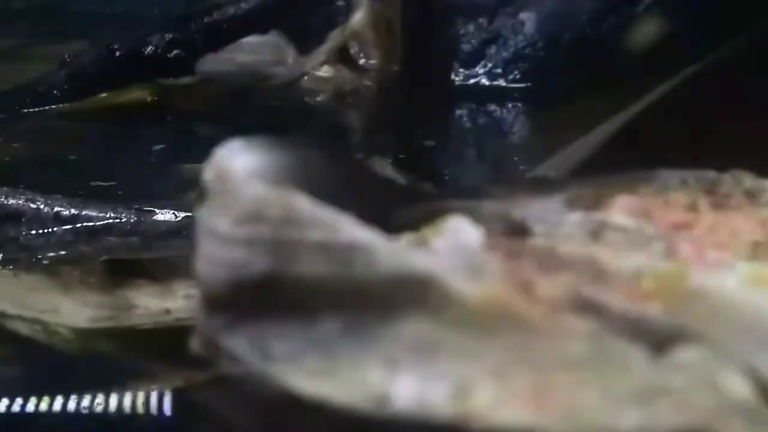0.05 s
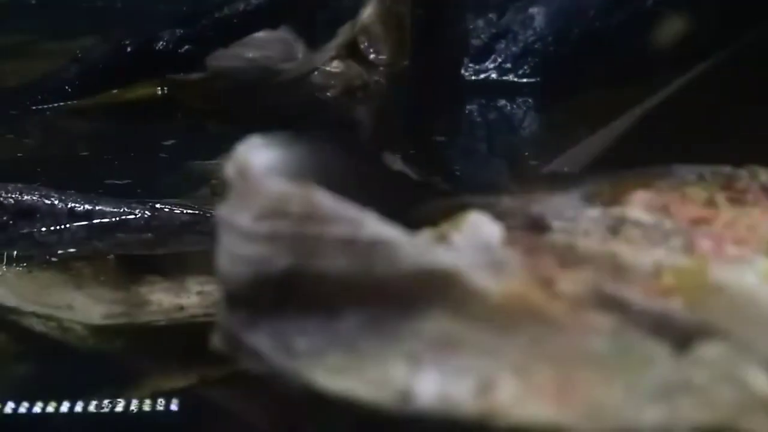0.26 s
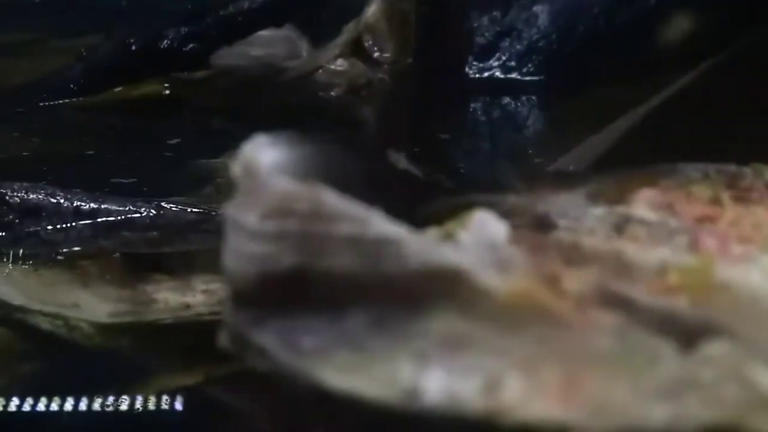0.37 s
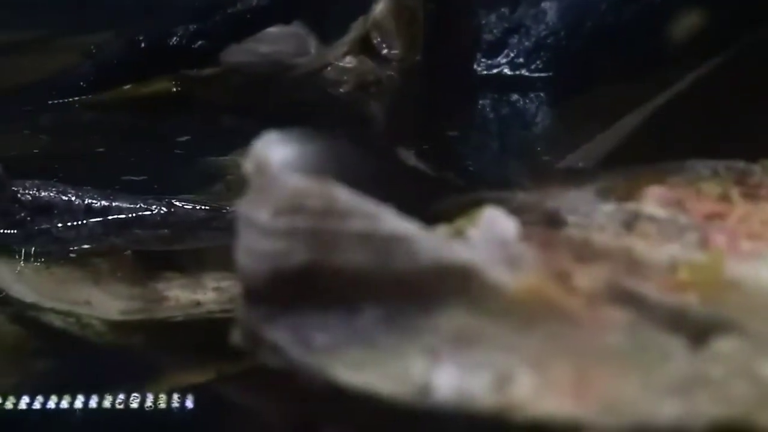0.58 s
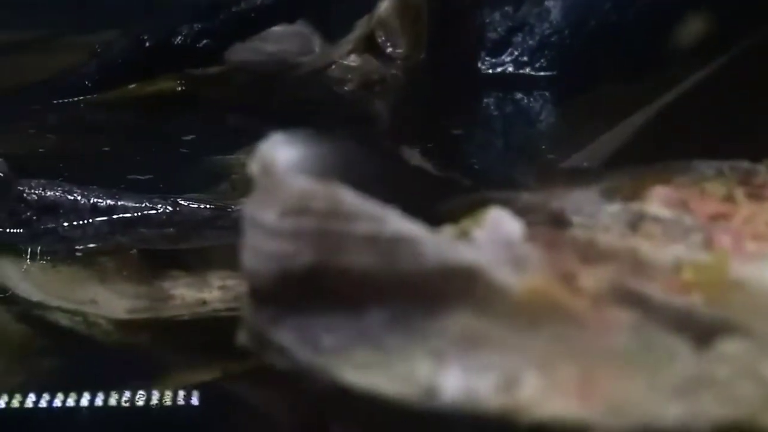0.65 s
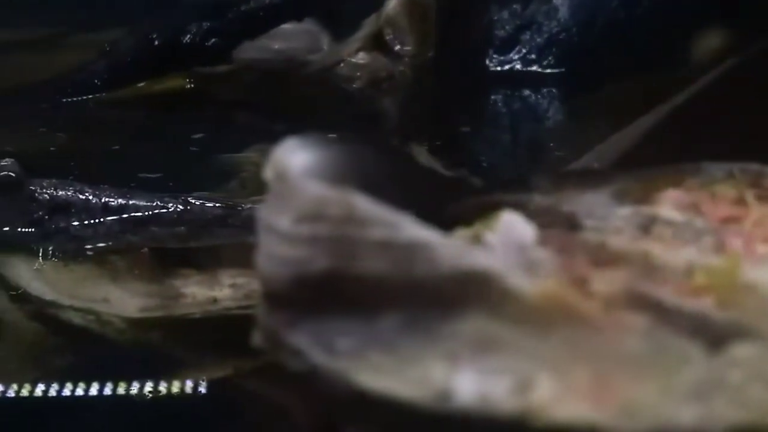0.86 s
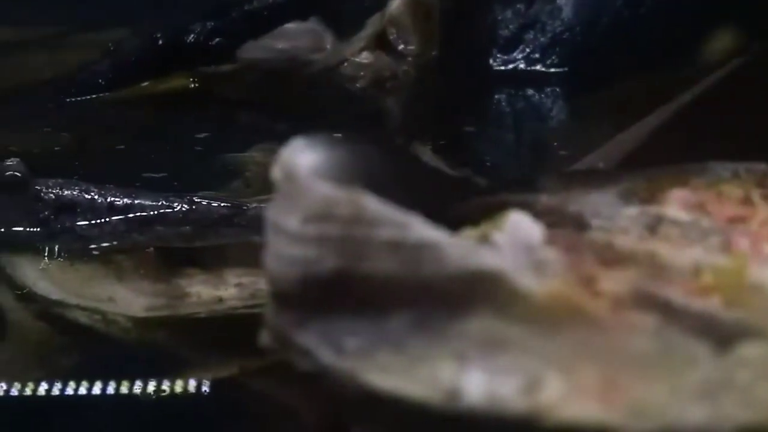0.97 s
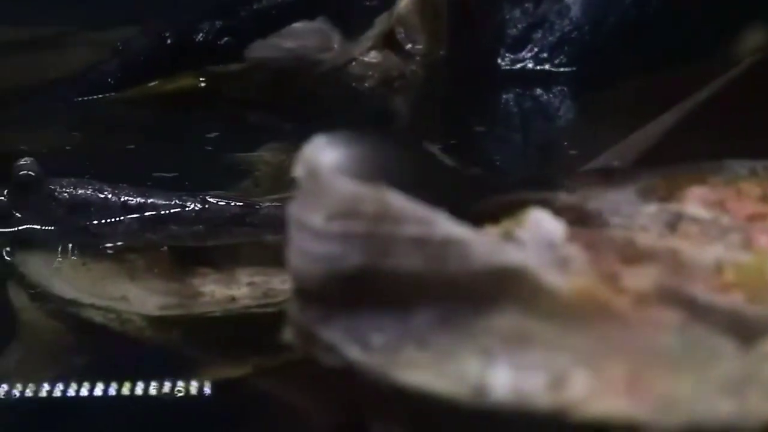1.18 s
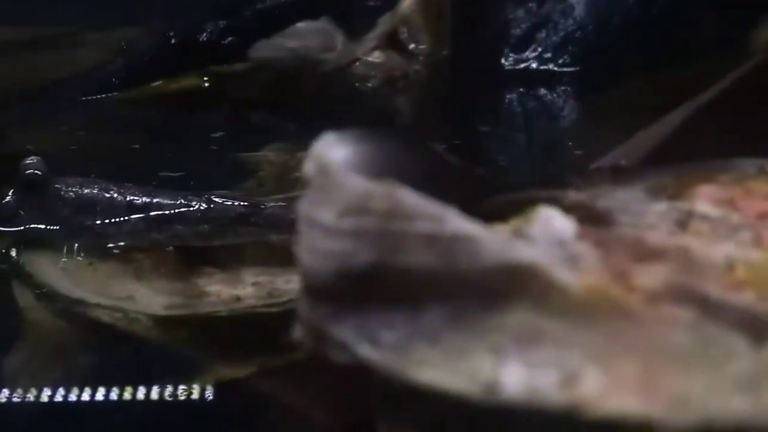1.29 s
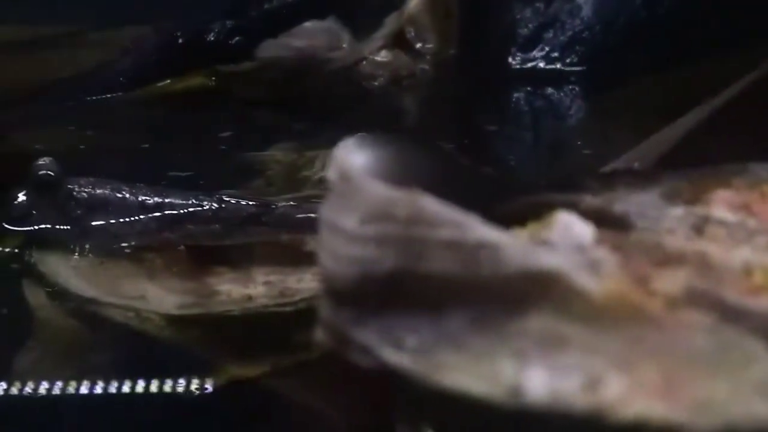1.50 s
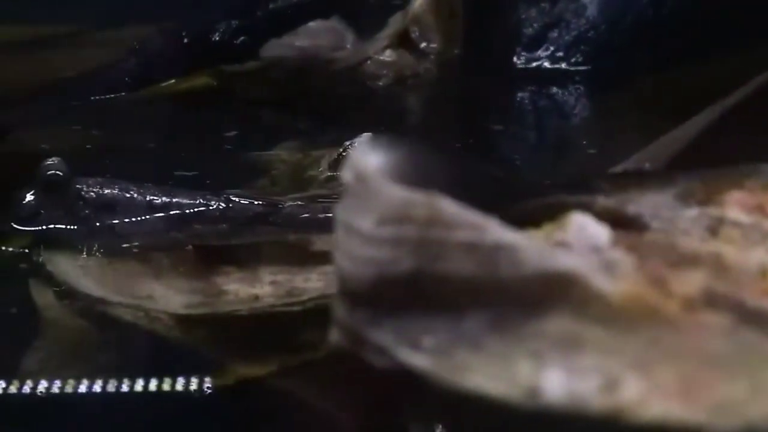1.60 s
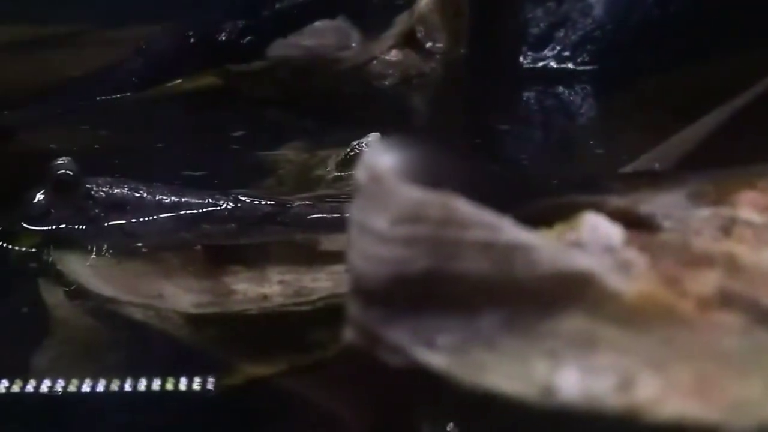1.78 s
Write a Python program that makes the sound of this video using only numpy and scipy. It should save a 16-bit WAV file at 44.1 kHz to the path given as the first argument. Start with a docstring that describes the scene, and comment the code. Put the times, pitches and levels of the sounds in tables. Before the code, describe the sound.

Steady aquarium filter hum and faint water flow, with soft thuds from handling the microphone.

```python
"""An aquarium pump hums at harmonics of the mains while its filter keeps water rushing, pulsing with
every stroke. The rush excites resonances of the tank, and a few small bubbles ring at the surface.
A hand shifts on the camera: soft pushes thud through the case, the hardest make it creak, and one
makes the limiter duck the hum for most of a second. The two microphones are wired in opposite polarity."""
import sys
import numpy as np
from scipy import signal
from scipy.fft import rfft, irfft
from scipy.io import wavfile
from scipy.ndimage import uniform_filter1d, minimum_filter1d, map_coordinates

SR = 44100
rng = np.random.default_rng(int(sys.argv[2]) if len(sys.argv) > 2 else 0)


def materialize(psi):
    """Save the field psi as 16-bit PCM at rate SR to the path in sys.argv[1].

    A 1-D psi becomes a single channel; in a 2-D psi each row is a channel.
    """
    bounded = np.clip(np.atleast_2d(psi).T, -1, 1)
    quanta = np.round(bounded * 32767).astype(np.int16)
    wavfile.write(sys.argv[1], SR, quanta)


N = 81585

# Partials of the pump: harmonic number, relative level/dB
HUM_PARTIALS = [(1, -66), (2, -62), (3, -55.5), (4, -60.5), (6, -76), (7, -74), (8, -68.5), (10, -75),
                (11, -66.5), (12, -67), (13, -72.5), (14, -79.5), (18, -80), (20, -83), (22, -82),
                (32, -84), (45, -85), (50, -88), (51, -89)]
# Spectrum of the rushing water: f/Hz, relative spectral level/dB
RUSH_SPECTRUM = [(100, -76), (200, -80), (300, -86.5), (400, -96.5), (520, -93), (680, -90), (830, -93.5),
                 (940, -97), (1070, -91), (1400, -96), (1700, -94), (2200, -99.5), (2800, -99),
                 (3400, -104), (4200, -106.5), (5500, -110), (8000, -114.5), (13500, -121.5)]
# Resonances of the tank: f/Hz, bandwidth/Hz, relative spectral level/dB
TANK_MODES = [(1071, 21, -86), (1030.4, 21, -82.5), (1192, 6.7, -102), (1637, 100, -91), (2770, 6.7, -86)]
# Slow drift of the water sound: t/s, gain/dB
FLOW_GAIN = [(0, -.6), (.8, 0.7), (1.25, 0.1), (1.85, 0)]
# Pushes of the hand: t/s, force level/dB, contact time/ms, bass corner f/Hz
PUSHES = [(0.2018, -14, 6.55, 68.2), (0.222, -22, 8.3, 71.4), (.24, -16.5, 17.5, 42.7), (0.2942, -2, 8, 46),
          (0.3502, 6, 4.4, 59.8), (0.4353, -5, 6.06, 57), (0.609, -14.5, 10.7, 59.9), (.801, -27, 8.8, 56),
          (1.077, -26, 6.6, 62.6), (1.1, -27, 17.5, 52), (1.402, -29, 14.5, 53.27),
          (1.4428, -24.5, 6.6, 61.3), (1.475, -25, 10.5, 53), (1.558, -34, 5.1, 98),
          (1.62, -30.5, 14.4, 47.7), (1.768, -29, 10.6, 54), (1.828, -28, 9.5, 66.4)]
# Slips of the case: t/s, knock gain/dB, click level/dB
SLIPS = [(.2965, -7.5, -72), (0.3015, -3.5, -58), (0.3086, -21, -67), (0.3526, 11, -56),
         (0.3594, -4.5, -57)]
# Spectrum of a slip's knock: f/Hz, relative spectral level/dB
KNOCK_SPECTRUM = [(200, -66), (450, -67.5), (620, -61), (1000, -75.5), (2000, -89.5), (3000, -90.5),
                  (6000, -104), (14000, -116)]
# Bubbles at the surface: t/s, f/Hz, relative level/dB
BUBBLES = [(0.887, 1223, -62), (1.268, 1238, -58.5), (1.47, 1233, -57), (1.652, 1670, -58)]

MAINS_HZ = 60.02
TANK_LAG_S = 0.0004867  # sound from the tank reaches the left microphone later


def undb(db):
    """Amplitude ratio of a level in decibels."""
    return 10 ** (np.asarray(db) / 20)


def wander(per_s):
    """Slow random modulation: linear interpolation between Gaussian values."""
    return np.interp(np.arange(N) / SR * per_s, np.arange(400), rng.standard_normal(400))


def shape(x, response):
    """Linear filtering: the spectrum is multiplied by a frequency response."""
    return irfft(rfft(x) * response(np.fft.rfftfreq(N, 1 / SR)), N)


def noise(spectrum, envelope=1):
    """Source and filter: enveloped white noise is coloured by a spectrum (f/Hz, level/dB)."""
    hz, db = np.array(spectrum).T
    white = rng.standard_normal(N) * envelope * np.sqrt(SR / 2)
    return shape(white, lambda f: undb(np.interp(np.log(f + 1), np.log(hz), db)))


def delay(x, lag_s):
    """Propagation delay, interpolated between samples."""
    return map_coordinates(x, [np.arange(N) - lag_s * SR], mode="mirror")


def pump(t, gain_db=0.5, waver_db=0.76):
    """Forced vibration: the mains drives the pump at its harmonics, each wavering a little in level."""
    hum = np.zeros(N)
    for harmonic, db in HUM_PARTIALS:
        amplitude = np.sqrt(2) * undb(db + gain_db + waver_db * wander(per_s=4.2))
        hum += amplitude * np.sin(2 * np.pi * (harmonic * MAINS_HZ * t + rng.random()))
    return np.array([delay(hum, TANK_LAG_S), hum])


def rush(t, depth=0.37, decay_cycles=0.12, flicker_db=1.08):
    """Amplitude modulation: the flow noise flickers, and surges at each stroke of the pump."""
    surge = 1 + depth * np.exp(-(MAINS_HZ * t % 1) / decay_cycles)
    surge /= np.sqrt(np.mean(surge ** 2))
    return noise(RUSH_SPECTRUM, surge * undb(flicker_db * wander(per_s=13.93)))


def tank():
    """Resonance: under broadband excitation each mode of the tank sounds as a narrow band of noise."""
    return sum(shape(noise([(hz, db)]), lambda f: 1 / (1 + (2 * (f - hz) / width) ** 2))
               for hz, width, db in TANK_MODES)


def water(t, diffuse_hz=5200, right_bias_db=1.5):
    """Direct and diffuse fields: the treble of the rush comes from all sides, so it is uncorrelated."""
    direct = shape(rush(t), lambda f: 1 / np.hypot(1, f / diffuse_hz)) + tank() + bubbles(t)
    diffuse = [shape(noise(RUSH_SPECTRUM), lambda f: f / np.hypot(f, diffuse_hz)) for side in "LR"]
    balance = undb(right_bias_db * np.array([[-.5], [.5]]))
    drift = undb(np.interp(t, *np.array(FLOW_GAIN).T))
    return drift * balance * (np.array([delay(direct, TANK_LAG_S), direct]) + diffuse)


def push(age, contact_ms):
    """Soft contact: the force swells and lets go as a sine-squared pulse."""
    return np.sin(np.pi * np.clip(age * 1000 / contact_ms, 0, 1)) ** 2


def case_thud(force, corner_hz, ring_ratio=1.185, ring_db=-0.5):
    """Transient response: a steep bass cut makes a falling thud; the case rings just above the corner."""
    thud = signal.sosfilt(signal.butter(6, corner_hz, "high", fs=SR, output="sos"), force)
    resonance = signal.iirpeak(ring_ratio * corner_hz, Q=3.5, fs=SR)
    return thud + undb(ring_db) * signal.lfilter(*resonance, thud)


def handling(t, tremor_per_s=260, tremor_db=-44, right_db=-2.5):
    """Structure-borne sound: pushes and grip tremor reach the right microphone weaker and later."""
    thuds = sum(undb(db) * case_thud(push(t - start, contact_ms), hz)
                for start, db, contact_ms, hz in PUSHES)
    taps = (rng.random(N) < tremor_per_s / SR) * rng.choice([-1, 1], N) * undb(tremor_db)
    tremor = signal.fftconvolve(taps, push(t, contact_ms=11.25))[:N]
    thuds += case_thud(tremor, corner_hz=46.6)
    return np.array([thuds, undb(right_db) * delay(thuds, lag_s=0.0004)])


def fade(age, decay_s):
    """Damping: exponential decay after a sudden onset."""
    return (age >= 0) * np.exp(-np.maximum(age, 0) / decay_s)


def creaks(t):
    """Stick-slip friction: the case slips under the hardest pushes with hollow knocks and tiny clicks."""
    knock = sum(undb(db) * fade(t - start, decay_s=0.0033) for start, db, _ in SLIPS)
    click = sum(undb(db) * fade(t - start, decay_s=0.0003) for start, _, db in SLIPS)
    knocks = np.array([noise(KNOCK_SPECTRUM, knock) for side in "LR"])
    return knocks + click * rng.standard_normal((2, N))


def bubbles(t, rise_s=0.0086):
    """Damped oscillation: the air in each bubble rings at one pitch, swelling and dying away."""
    tones = np.zeros(N)
    for start, hz, db in BUBBLES:
        swell = np.maximum(t - start, 0) / rise_s
        tones += undb(db) * swell * np.exp(1 - swell) * np.sin(2 * np.pi * hz * (t - start))
    return tones


def scene():
    """Superposition: pump, water and the hand on the camera add at the two microphones."""
    t = np.arange(N) / SR
    return pump(t) + water(t) + handling(t) + creaks(t)


def record(dry, limit_db=-5, release_db_per_s=8.5, lookahead_s=0.003):
    """Peak limiting with slow release; then right-channel inversion, hiss, whine and a steep top cut."""
    t = np.arange(N) / SR
    peak_db = 20 * np.log10(np.abs(dry).max(axis=0) + 1e-9)
    excess_db = np.maximum(peak_db - limit_db, 0)
    duck_db = np.maximum.accumulate(excess_db + release_db_per_s * t) - release_db_per_s * t
    window = int(lookahead_s * SR)
    gain = uniform_filter1d(minimum_filter1d(undb(-duck_db), 2 * window), window)
    polarity = np.array([[1], [-1]])
    # the camera's electronics
    hiss = undb(-84) * rng.standard_normal((2, N))
    whine_hz, whine_lag_s = 14000, np.array([[0.00002], [0]])
    whine = undb(-88) * np.sqrt(2) * np.sin(2 * np.pi * whine_hz * (t - whine_lag_s))
    top_cut = signal.ellip(10, .1, 60, 14300, fs=SR, output="sos")
    return signal.sosfilt(top_cut, dry * gain * polarity + hiss + whine)


dry = scene()
out = record(dry)
materialize(out)
```